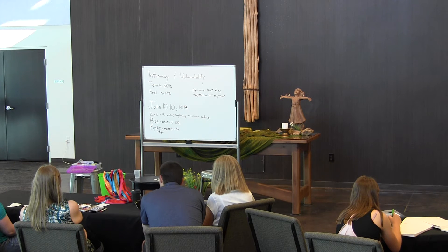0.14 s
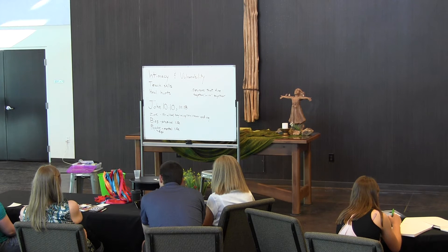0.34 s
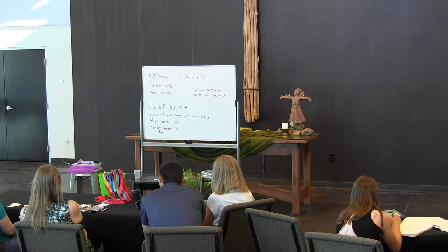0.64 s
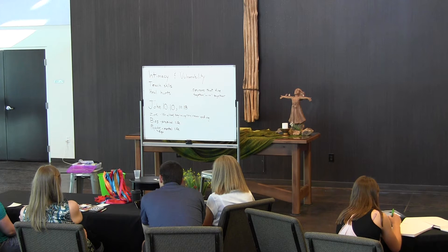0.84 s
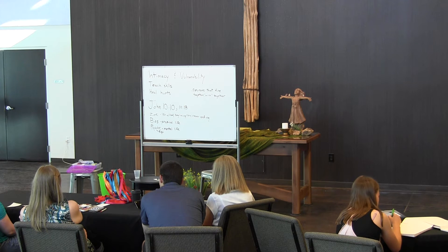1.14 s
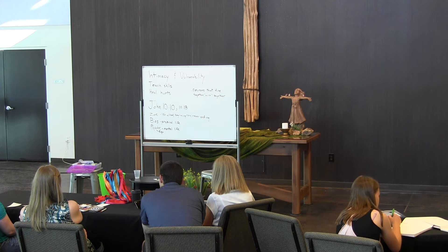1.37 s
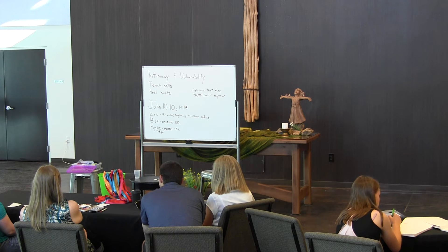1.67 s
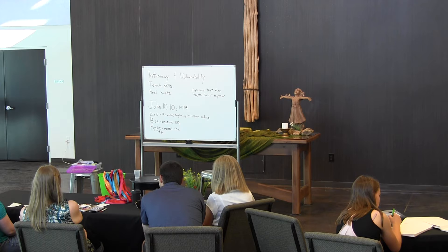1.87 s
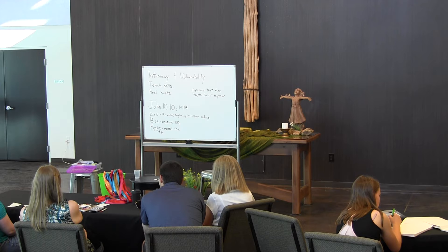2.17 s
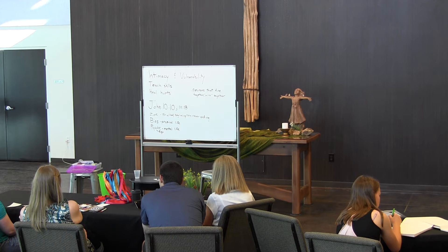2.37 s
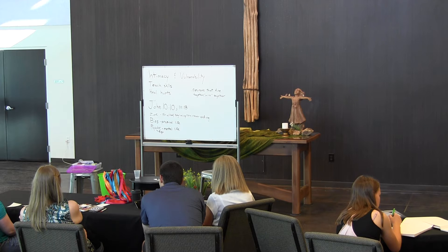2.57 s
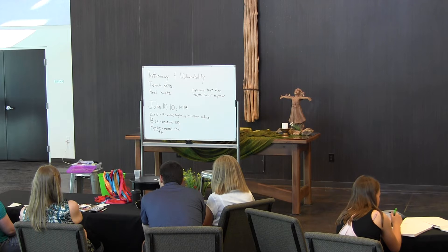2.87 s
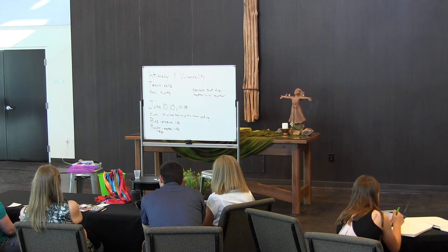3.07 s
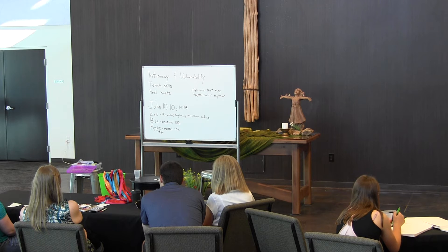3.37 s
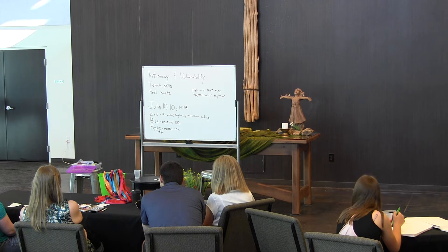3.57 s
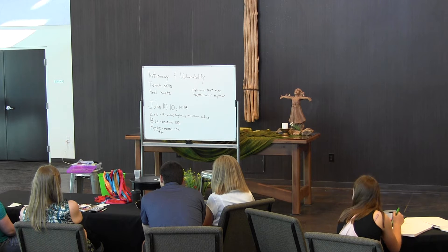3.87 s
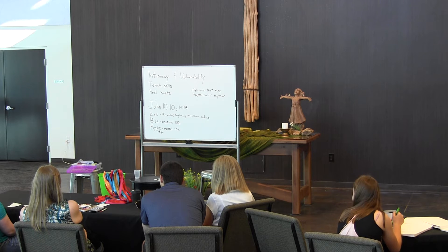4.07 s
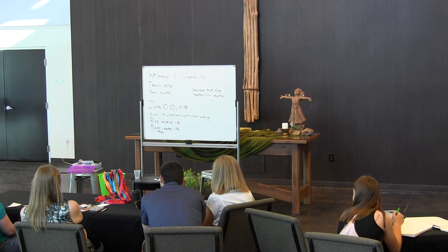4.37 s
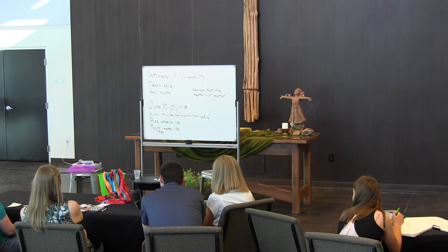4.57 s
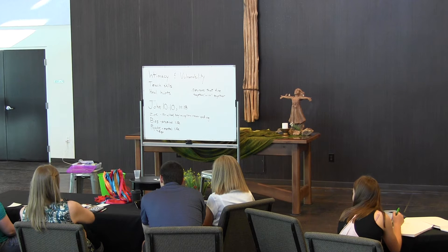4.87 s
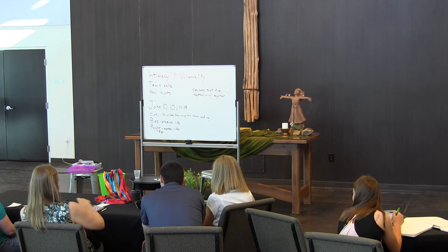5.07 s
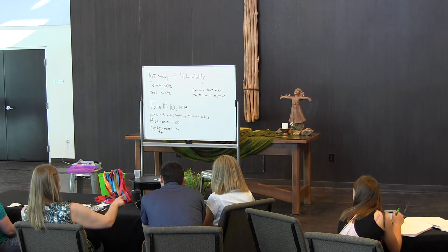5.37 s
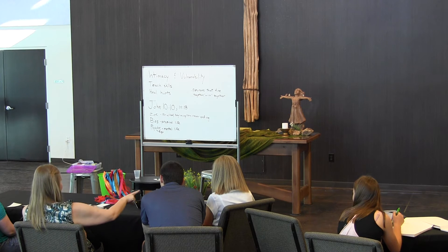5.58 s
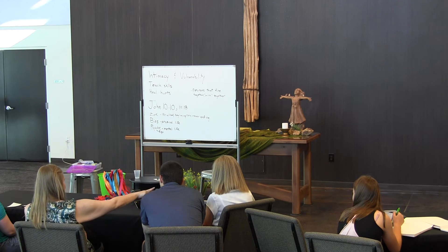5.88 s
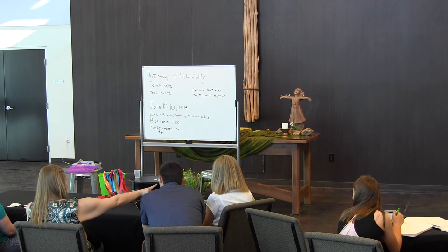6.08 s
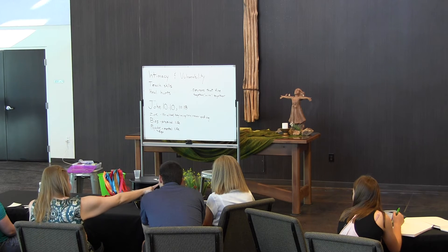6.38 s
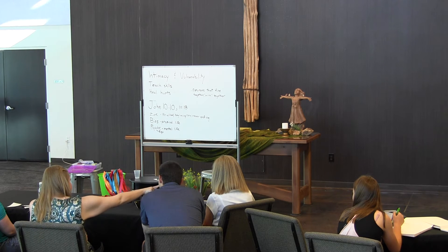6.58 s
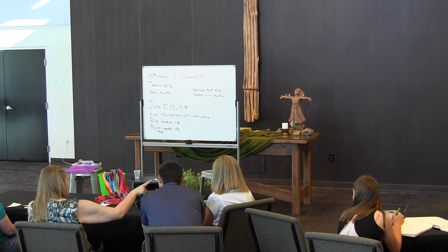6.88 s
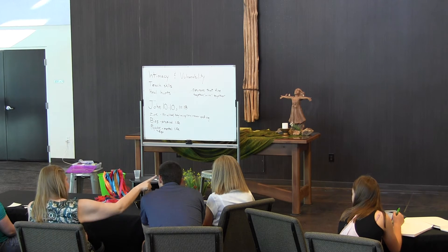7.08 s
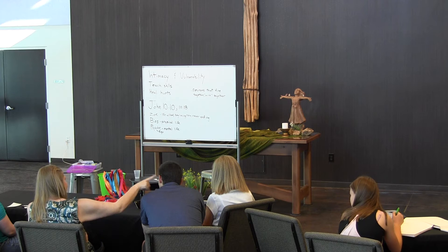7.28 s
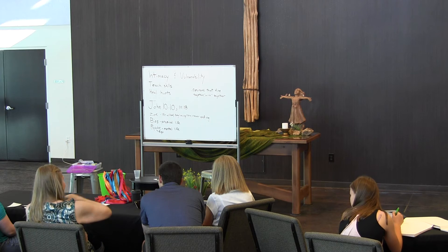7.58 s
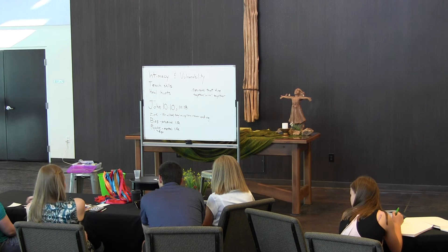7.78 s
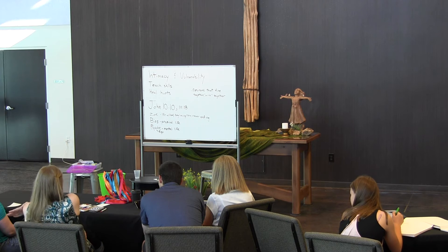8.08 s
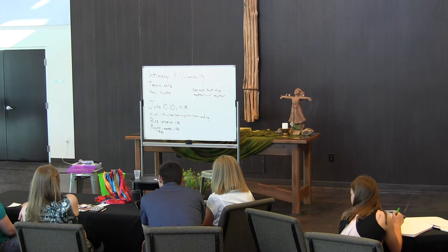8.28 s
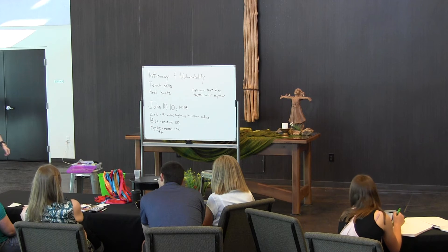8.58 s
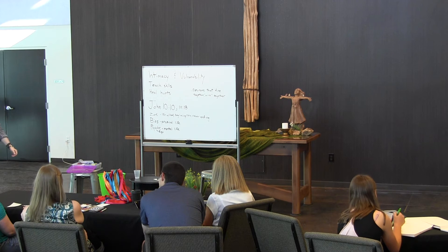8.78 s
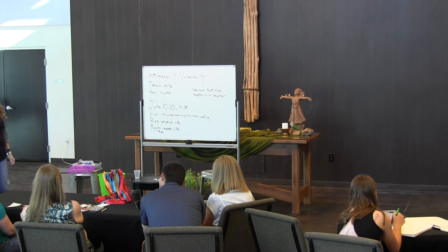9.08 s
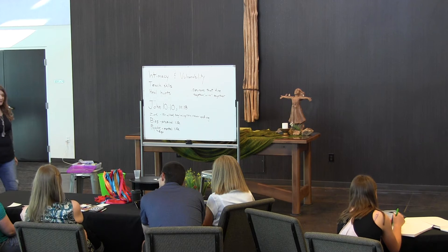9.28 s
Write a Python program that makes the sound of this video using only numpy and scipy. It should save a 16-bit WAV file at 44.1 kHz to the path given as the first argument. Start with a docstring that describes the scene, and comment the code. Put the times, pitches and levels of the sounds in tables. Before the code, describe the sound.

A continuous ground-loop hum dominates, low and fixed in pitch, with a dense raspy buzz of evenly spaced overtones. Fine high ticking and thin whistling grit ride on top, with faint steady hiss beneath. It starts at once and never changes. The seated people, the reaching arm and the hall make no audible sound; the noise is electrical, direct and dry, nearly centred.

```python
"""Mains hum from a ground loop

A camera's audio cable in a quiet hall picks up a ground loop that carries the currents of dimmers and power
supplies. Each load switches at its own instants of every half cycle, as gated currents over a mains sine.
Gaussian spikes, high ticks, supply whistles and gated noise flares buzz on top; the stepped frame buzz of a
screen slides slowly through the cycle, over steady coloured hiss and a faint signal set opposite in the two
channels."""
import sys
import numpy as np
from scipy import signal
from scipy.fft import rfft, irfft, next_fast_len
from scipy.io import wavfile
from scipy.ndimage import uniform_filter1d

SR = 44100
rng = np.random.default_rng(int(sys.argv[2]) if len(sys.argv) > 2 else 0)


def transcribe(u):
    """Save the signal u as a 16-bit wav file named by the first command-line argument.

    u: samples, shape (n,) or (channels, n), limited to [-1, 1]; the rate is SR.
    q: integer samples, one column per channel.
    """
    v = np.clip(np.atleast_2d(u).T, -1, 1)
    q = np.round(v * 32767).astype(np.int16)
    wavfile.write(sys.argv[1], SR, q)


N = 415863

# all places in the cycle are in ms of a nominal 60 Hz mains cycle
HALF_MS = 1000 / 120
CYCLE_MS = 2 * HALF_MS


def undb(db):
    """Logarithmic level law: amplitude ratio of a level in dB."""
    return 10 ** (np.asarray(db) / 20)


def unit(x):
    """Power normalisation: the signal scaled to rms 1."""
    return x / np.sqrt(np.mean(x ** 2))


def band(x, hz, width_hz):
    """Frequency selection: Butterworth band-pass along the last axis."""
    edges = np.clip([hz - width_hz / 2, hz + width_hz / 2], 20, SR / 2 - 1000)
    return signal.sosfilt(signal.butter(2, edges, "bandpass", fs=SR, output="sos"), x)


def coloured(points):
    """Spectral shaping: white noise weighted in frequency is steady coloured noise, here of rms 1."""
    size = next_fast_len(N)
    hz, db = np.transpose(points)
    bins_hz = np.fft.rfftfreq(size, 1 / SR)
    gain = undb(np.interp(np.log(bins_hz + 1), np.log(hz), db))
    white = rfft(rng.standard_normal(size))
    return unit(irfft(gain * white, size)[:N])


def walk(rate_hz):
    """Low-pass fluctuation: random levels held 1 / rate_hz s, averaged twice over that time, at rms 1."""
    hold = int(SR / rate_hz)
    levels = np.repeat(rng.standard_normal(N // hold + 1), hold)
    slewed = uniform_filter1d(uniform_filter1d(levels, hold), hold)
    return unit(slewed[:N])


def fold(clock, at, period, lead):
    """Periodicity: time since the latest instant at (from -lead on) and the number of the period."""
    turn = np.floor((clock - at + lead) / period)
    return clock - at - turn * period, turn.astype(int) + 2


def near(clock, at, width):
    """Locality of a pulse: samples around a place in the cycle, time since it and cycle number."""
    since, turn = fold(clock, at, CYCLE_MS, HALF_MS)
    place = np.flatnonzero(np.abs(since) < 5 * width)
    return place, since[place], turn[place]


def bell(since, width):
    """Gaussian pulse: peak 1, width its standard deviation."""
    return np.exp(-.5 * (since / width) ** 2)


def mains_clock():
    """Phase is the integral of frequency: the mains phase in ms of the nominal cycle."""
    # the mains frequency, interpolated between points: time_s, frequency_hz
    mains = [(0, 59.9995), (2, 60.002), (4.1, 60.0035), (5.1, 60.0063), (6.1, 60.0088), (6.6, 60.010),
             (9.5, 60.0102)]
    start_cycle = .015
    wander_ms, tremble_ms = .002, .002  # rms
    frequency_hz = np.interp(np.arange(N) / SR, *np.transpose(mains))
    cycles = start_cycle + np.cumsum(frequency_hz) / SR
    # a very small slow and fast random unsteadiness of the cycle timing
    return CYCLE_MS * cycles + wander_ms * walk(1.2) + tremble_ms * walk(150)


def loads(clock):
    """Phase-controlled conduction: soft-edged currents droop straight from on to off, over a mains sine."""
    # loads that conduct once per half cycle; the two halves are unequal:
    # on_ms, off_ms, rise_ms (tanh time constant), first_half_level, second_half_level, share_left_at_off
    conduction = [(0.225, 0.923, 0.096, 0.027, 0.035, 0.63), (1.059, 2.092, 0.15, -0.13, -0.089, 1.216),
                  (2.087, 2.471, 0.013, -0.088, -0.0066, 0.39), (2.214, 4.388, 0.012, -0.022, 0.032, -0.24),
                  (4.403, 6.598, 0.029, 0.14, 0.12, 0.11), (4.43, 4.728, 0.028, 0.0042, 0.0062, 0.85),
                  (5.027, 6.275, 0.043, 0.0061, 0.045, 0.48), (6.579, 7.733, 0.1, -0.067, -0.045, 0.79),
                  (7.432, 7.684, 0.033, 0.019, 0.0023, 1.28)]
    fall_ms = 0.011  # tanh time constant
    leak, leak_crest_ms = 0.012, 7.3  # height of the plain sine, place of its crest
    grid = np.linspace(0, CYCLE_MS, 6001)
    cycle = leak * np.cos(np.pi * (grid - leak_crest_ms) / HALF_MS)
    for on, off, rise, first, second, left in conduction:
        since, turn = fold(grid, on, HALF_MS, 2)
        gate = (np.tanh(since / rise) - np.tanh((since - off + on) / fall_ms)) / 2
        droop = 1 - (1 - left) * np.clip(since / (off - on), 0, 1)
        level = np.where(turn % 2, second, first)
        cycle = cycle + gate * droop * level
    return np.interp(clock % CYCLE_MS, grid, cycle)


def spikes(clock):
    """Commutation impulses: equally narrow pulses, each with a random small shift in time and height."""
    # commutation spikes of the full cycle: place_ms, height (before scatter)
    commutation = [(1.364, -0.037), (1.48, -0.04), (2.211, -0.054), (6.787, 0.063), (9.697, -0.0076),
                   (9.813, -0.01), (10.049, -0.025), (10.324, -0.035), (10.544, -0.094), (11.407, -0.024),
                   (11.521, -0.017), (14.11, 0.0086), (14.511, 0.039)]
    width_ms, tremble_ms, scatter_db = .033, .003, .6  # standard deviations
    out = np.zeros(N)
    for at, height in commutation:
        place, since, turn = near(clock, at, width_ms)
        late, size = rng.standard_normal((N // 400, 2))[turn].T
        pulse = bell(since - tremble_ms * late, width_ms)
        out[place] += height * undb(scatter_db * size) * pulse
    return out


def hum_width(hum):
    """Stereo width: a faint, slightly late band of low hum, to be set opposite in the two channels."""
    # the opposed band of the hum: centre_hz, width_hz, share_db, lag_ms
    opposed_band = (142, 104, -25, 1.5)
    hz, width_hz, share_db, lag_ms = opposed_band
    return undb(share_db) * np.roll(band(hum, hz, width_hz), int(lag_ms * SR / 1000))


def screen():
    """Frame-rate load steps: their period is not tied to the mains, and high-passed edges overshoot."""
    # current steps of one frame: place_ms, relative_level from then on
    frame_steps = [(.25, .0010), (4.45, -.0024), (8.0, -.0005), (10.40, .0052), (11.97, -.0080),
                   (12.62, -.0024), (13.13, .0010), (16.07, .0038)]
    frame_hz, gain_db = 60.0222, 0.5
    overshoot, overshoot_hz = 0.7, 2050  # share of the high-passed steps, cutoff
    at, level = np.transpose(frame_steps)
    ms = np.arange(N) / SR % (1 / frame_hz) * 1000
    steps = uniform_filter1d(level[np.searchsorted(at, ms) - 1], size=3)
    edges = signal.lfilter(*signal.butter(1, overshoot_hz, "high", fs=SR), steps)
    return undb(gain_db) * (steps + overshoot * edges)


def tone_bursts(clock, rows, slip):
    """Gated oscillation: cosines under Gaussian envelopes; slip is the rms phase scatter in turns."""
    scatter_db, detune_share = .8, .008  # standard deviations of level and relative frequency
    out = np.zeros(N)
    for at, length, hz, db in rows:
        place, since, turn = near(clock, at, length)
        turns, size, detune = rng.standard_normal((N // 400, 3))[turn].T
        phase = hz * (1 + detune_share * detune) * since / 1000 + slip * turns
        level = undb(db + scatter_db * size)
        out[place] += level * bell(since, length) * np.cos(2 * np.pi * phase)
    return out


def ticks(clock):
    """Phase-locked tone bursts: short 12.5 kHz ticks swell and fade around the sharpest edges."""
    # ticks of the full cycle: place_ms, peak_db (before scatter)
    tick_places = [(2.13, -41.5), (4.42, -44), (7.72, -48), (9.72, -42), (10.06, -36), (10.5, -40),
                   (14.11, -43.5), (16.06, -48)]
    tick_hz, width_ms = 12500, .08
    return tone_bursts(clock, [(at, width_ms, tick_hz, db) for at, db in tick_places], slip=.08)


def whistles(clock):
    """Free-running oscillators: switching supplies whistle, out of phase lock, while their rectifiers conduct."""
    # whistle bursts of the full cycle: place_ms, width_ms, pitch_hz, peak_db (before scatter)
    supply_tones = [(1.17, .20, 14950, -33.5), (3.8, .45, 14800, -50), (7.1, .40, 13000, -52),
                    (11.9, .19, 13450, -41), (13.3, .45, 13700, -52), (15.7, .30, 14500, -49)]
    return tone_bursts(clock, supply_tones, slip=3)


def flares(clock):
    """Cyclic noise modulation: the current is unsteady while the rectifiers charge."""
    # noise flares of the full cycle: place_ms, width_ms, centre_hz, bandwidth_hz, rms_db at the peak
    charging = [(10.2, 0.79, 1500, 1200, -45), (9.2, 0.057, 1300, 3000, -38), (10.8, 0.83, 7400, 8600, -43),
                (1.27, 0.36, 3100, 4900, -39.5), (7.0, 0.46, 2500, 4000, -51)]
    out = 0
    for at, length, hz, width_hz, db in charging:
        since, _ = fold(clock, at, CYCLE_MS, HALF_MS)
        noise = unit(band(rng.standard_normal(N), hz, width_hz))
        out = out + undb(db) * bell(since, length) * noise
    return out


def hiss():
    """Steady coloured noise: a common hiss, and a faint independent noise set opposite in the two channels."""
    # spectrum of the common hiss: frequency_hz, relative_level_db (per Hz)
    common_spectrum = [(25, -3), (100, -1), (350, -3), (800, -5), (1600, -6), (2500, -11), (6000, -14),
                       (11000, -14.5), (15500, -13.5)]
    # spectrum of the opposed noise: frequency_hz, relative_level_db (per Hz)
    opposed_spectrum = [(25, -10), (150, 15), (500, 8.5), (1100, -20.5), (2300, -13.5), (5000, -20.5),
                        (9000, -5), (12000, -6), (15500, -12)]
    common_db, opposed_db = -46.5, -55  # rms
    return undb(common_db) * coloured(common_spectrum), undb(opposed_db) * coloured(opposed_spectrum)


def scene():
    """Superposition: the hum is common to both channels; a small difference signal enters them opposed."""
    clock = mains_clock()
    hum = loads(clock) + spikes(clock)
    common_hiss, opposed_noise = hiss()
    apart = hum_width(hum) + opposed_noise
    buzz = screen() + ticks(clock) + whistles(clock) + flares(clock)
    common = hum + buzz + common_hiss
    return np.array([common + apart, common - apart])


def record(dry):
    """Band limitation: the input blocks direct current and a steep zero-phase low-pass cuts the top."""
    top_hz = 15790
    dry = dry - np.mean(dry, axis=1, keepdims=True)
    return signal.sosfiltfilt(signal.ellip(10, .1, 45, top_hz, fs=SR, output="sos"), dry)


dry = scene()
out = record(dry)
transcribe(out)
```